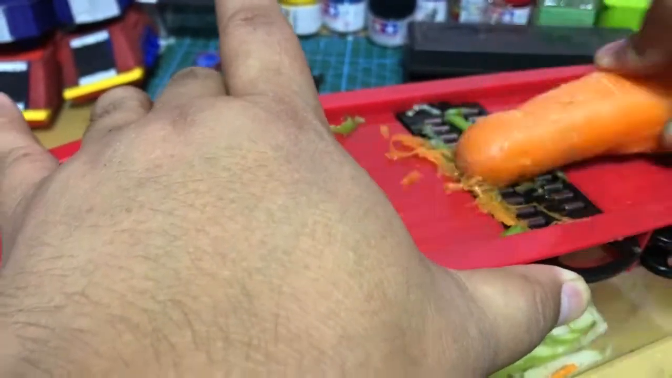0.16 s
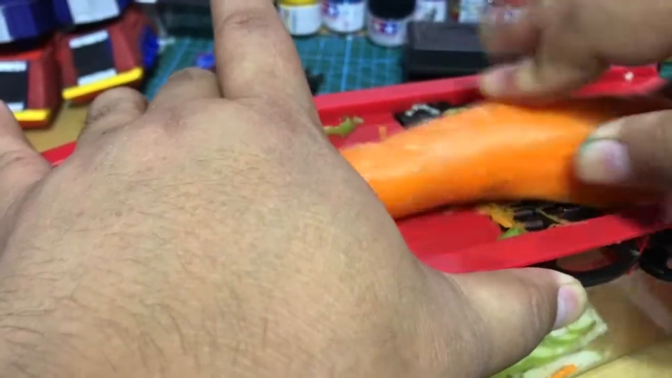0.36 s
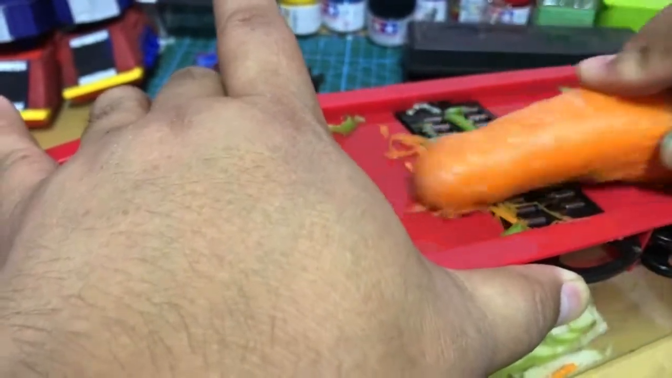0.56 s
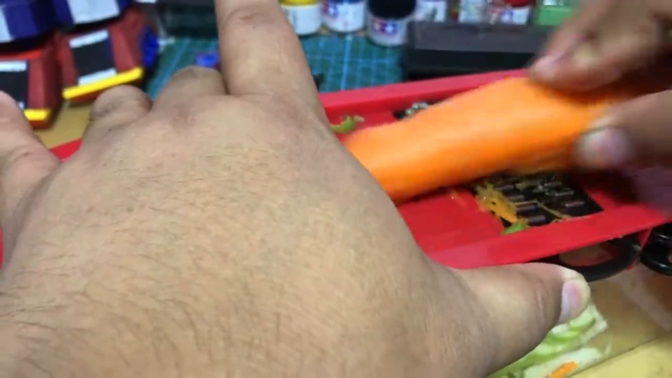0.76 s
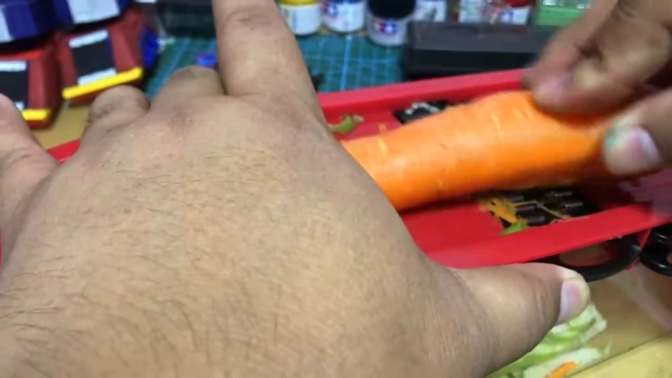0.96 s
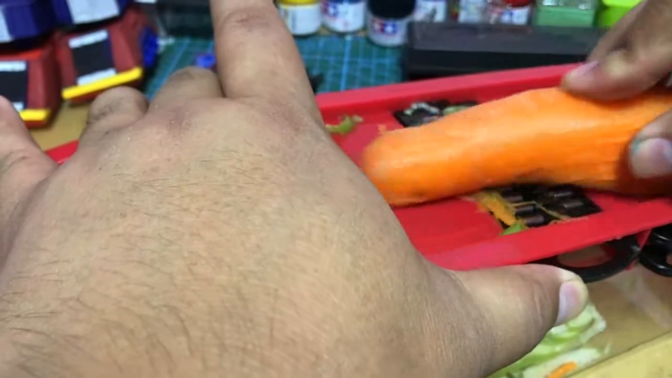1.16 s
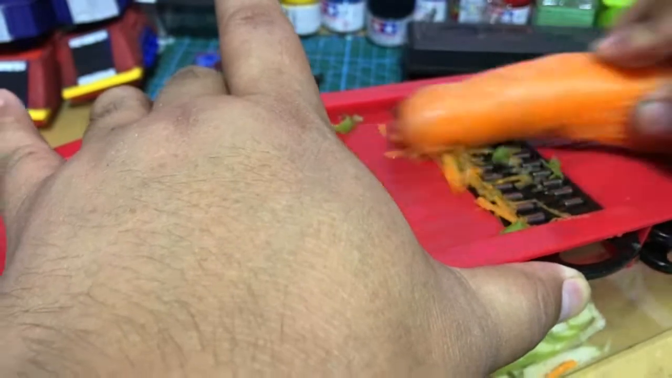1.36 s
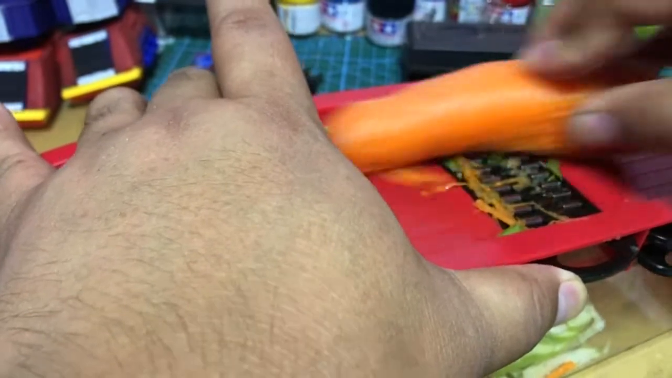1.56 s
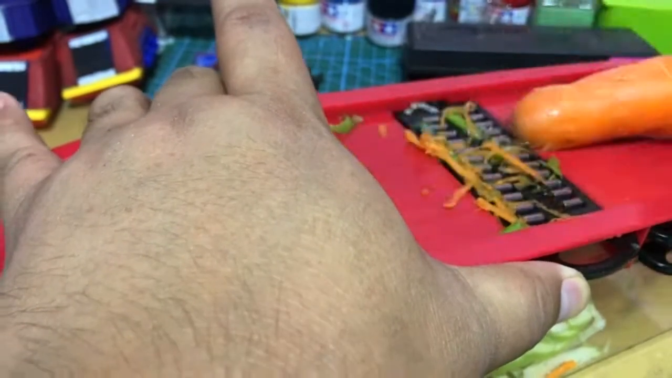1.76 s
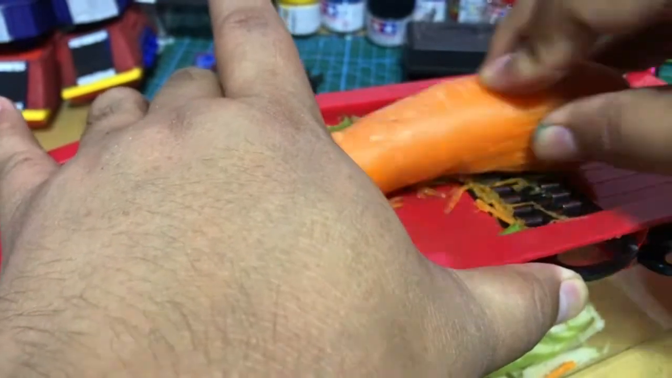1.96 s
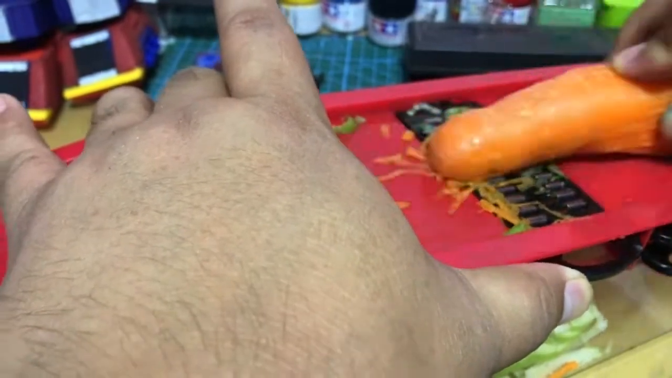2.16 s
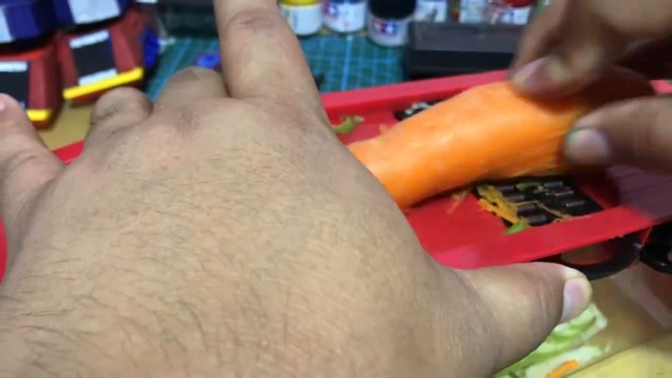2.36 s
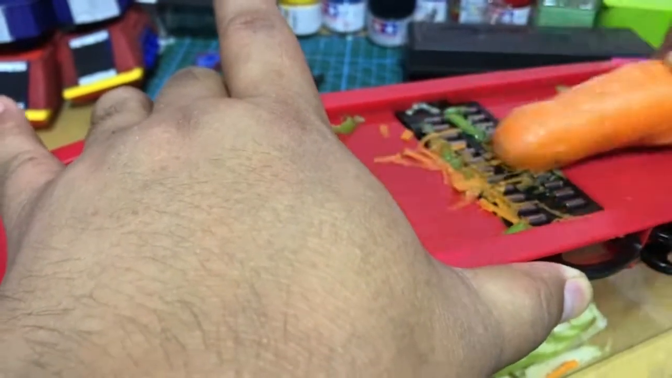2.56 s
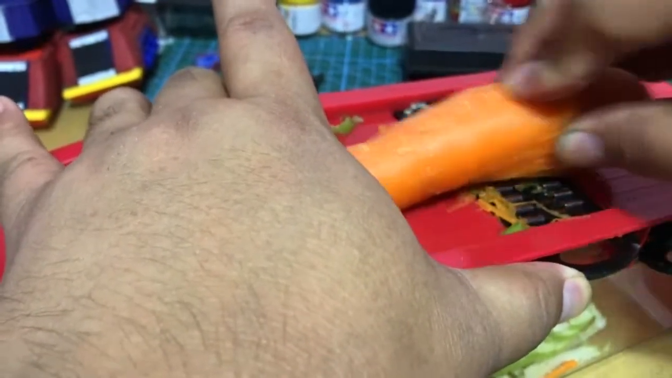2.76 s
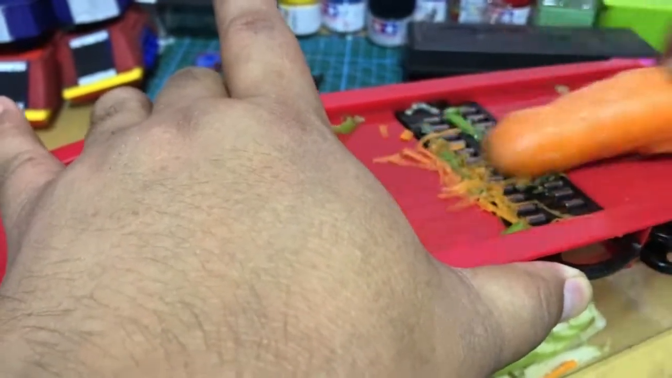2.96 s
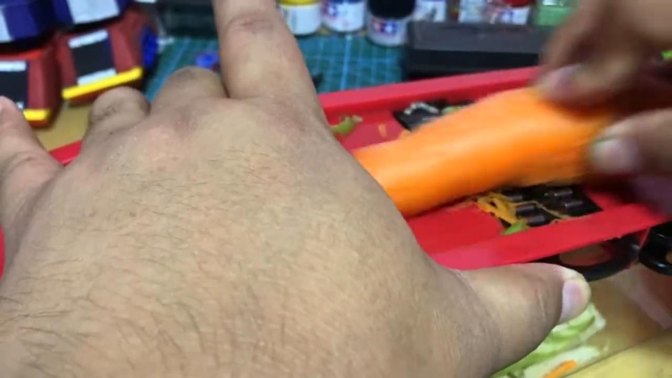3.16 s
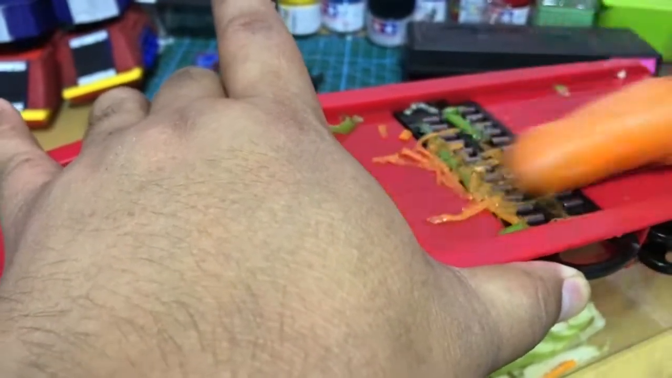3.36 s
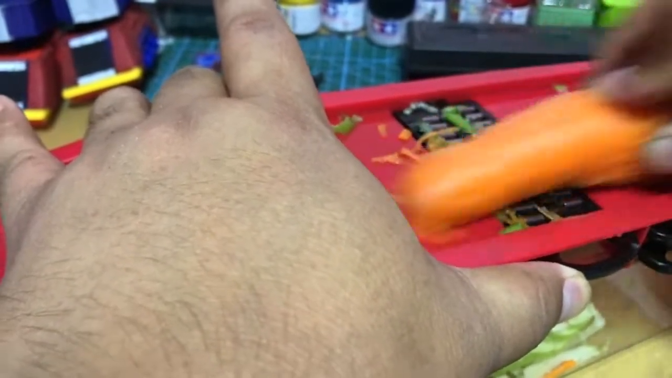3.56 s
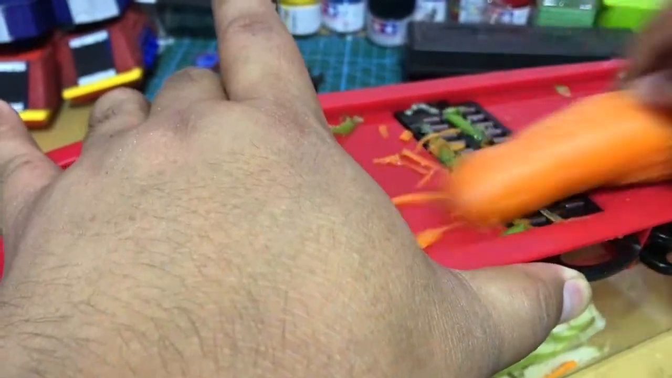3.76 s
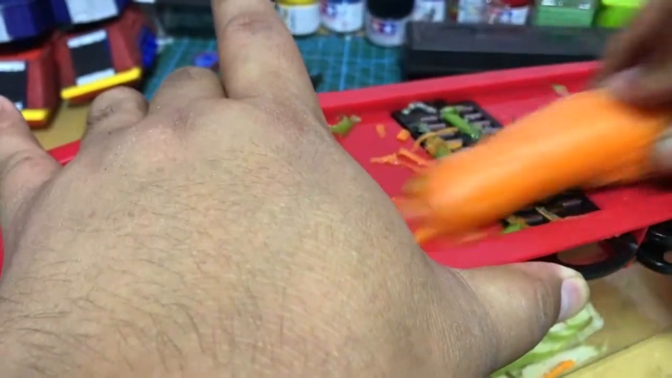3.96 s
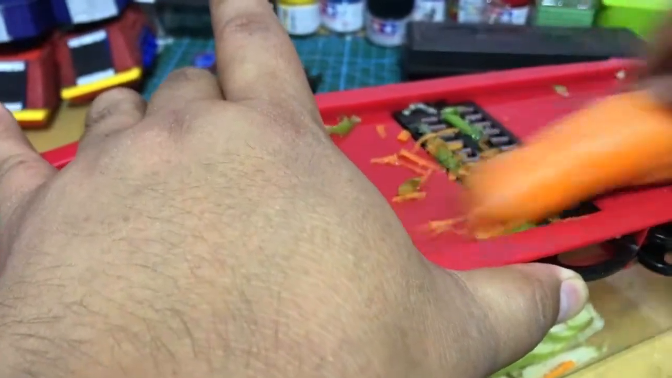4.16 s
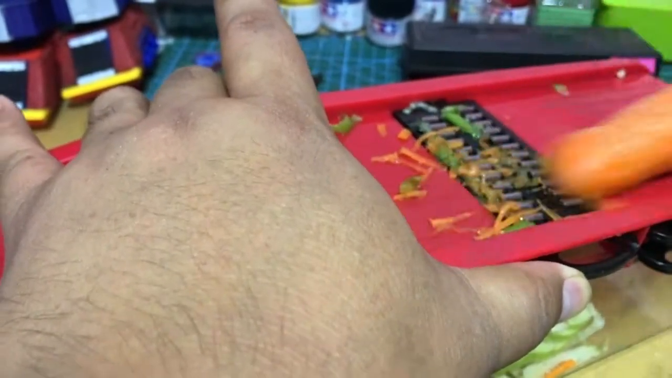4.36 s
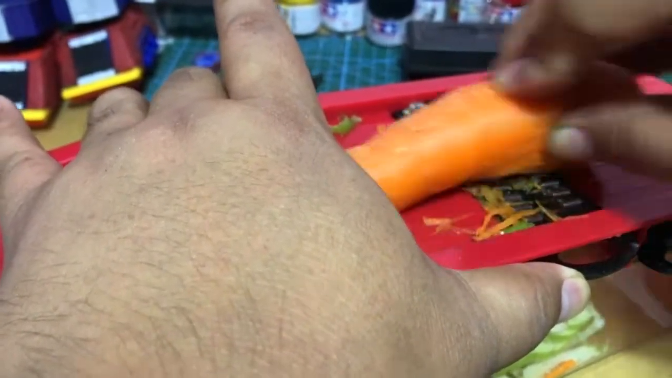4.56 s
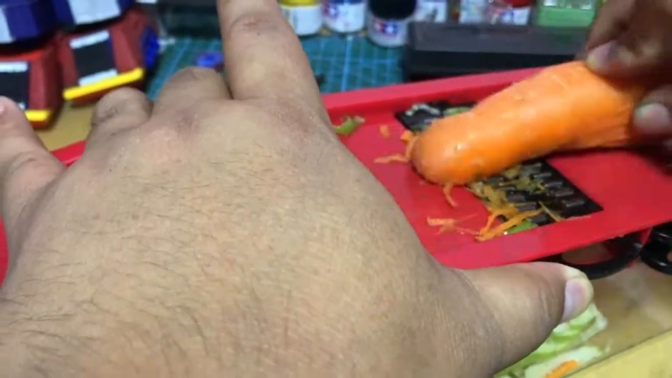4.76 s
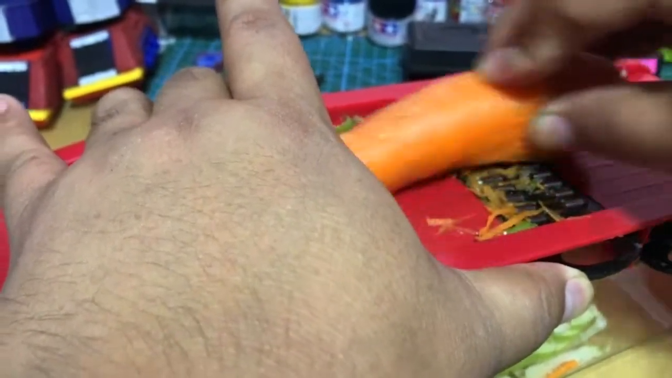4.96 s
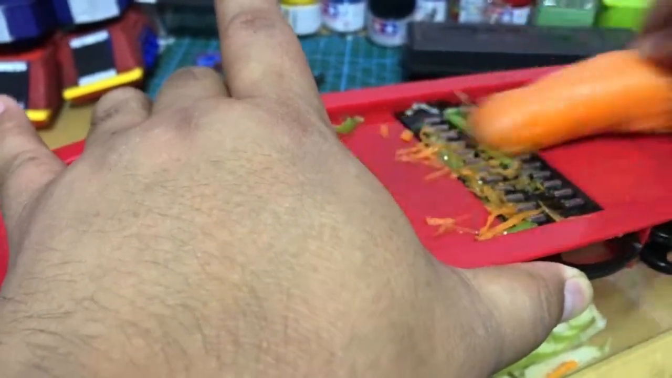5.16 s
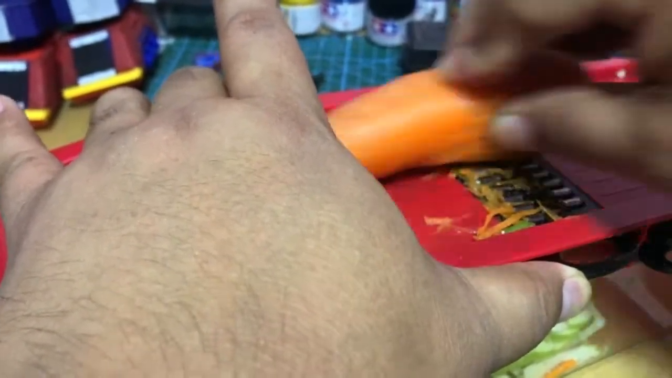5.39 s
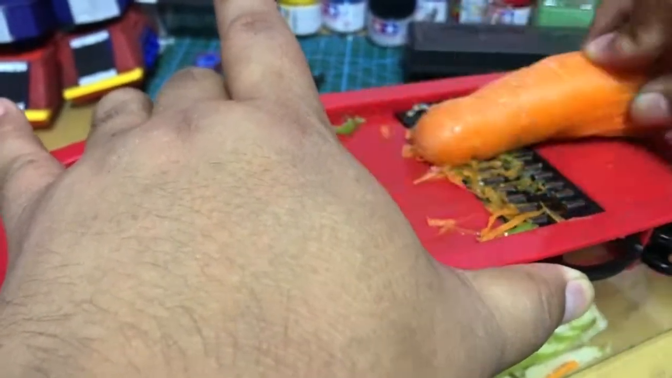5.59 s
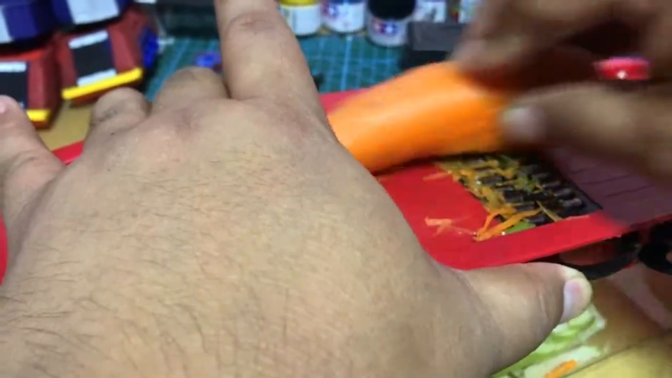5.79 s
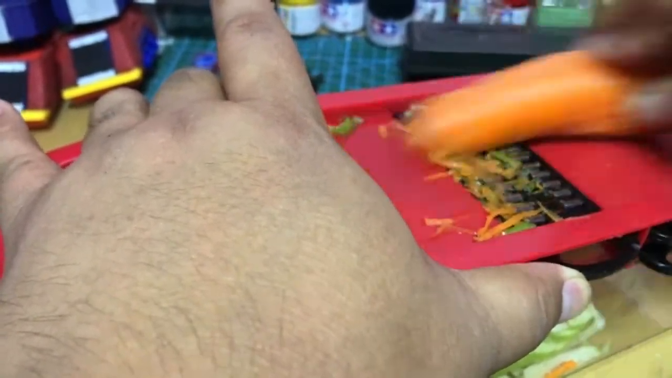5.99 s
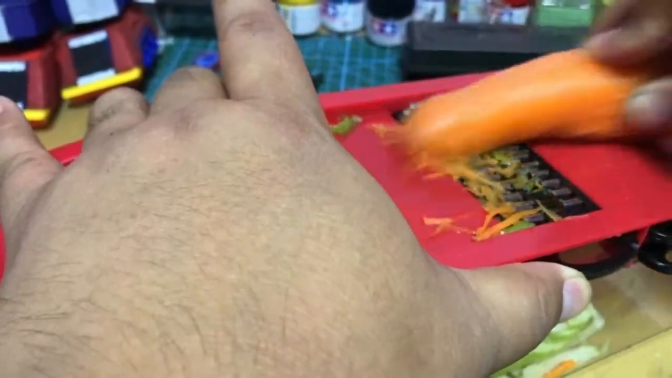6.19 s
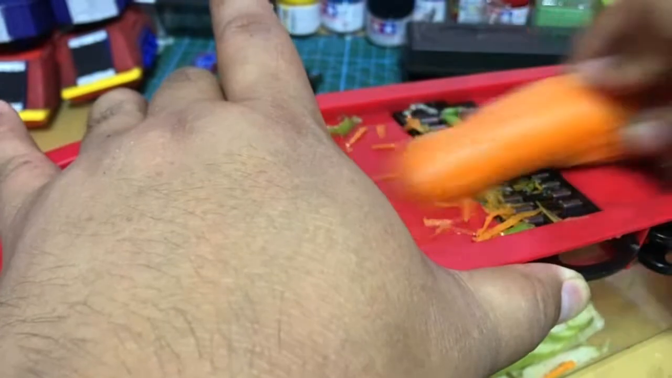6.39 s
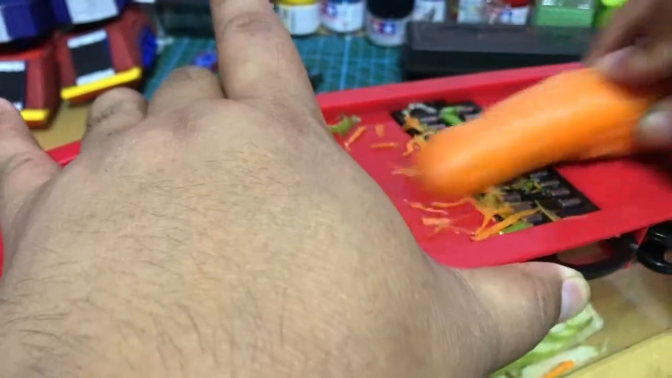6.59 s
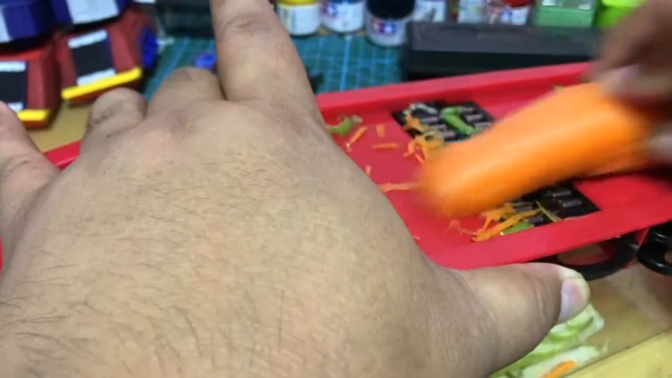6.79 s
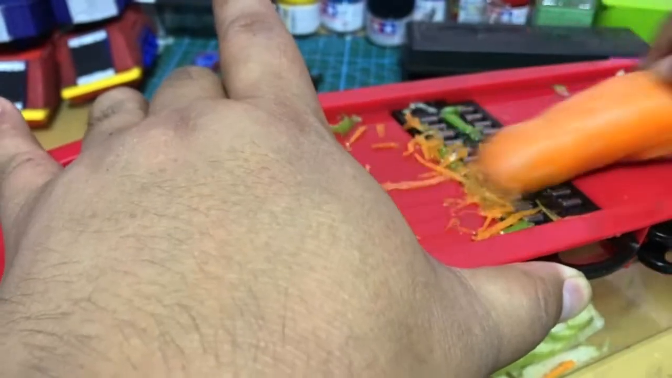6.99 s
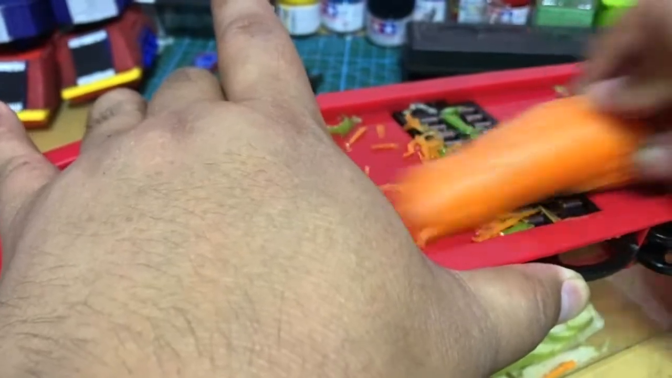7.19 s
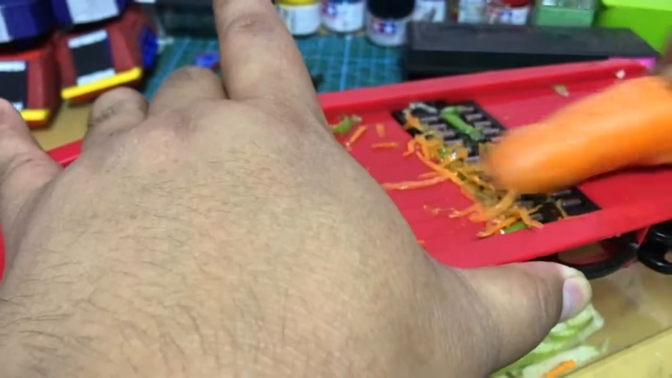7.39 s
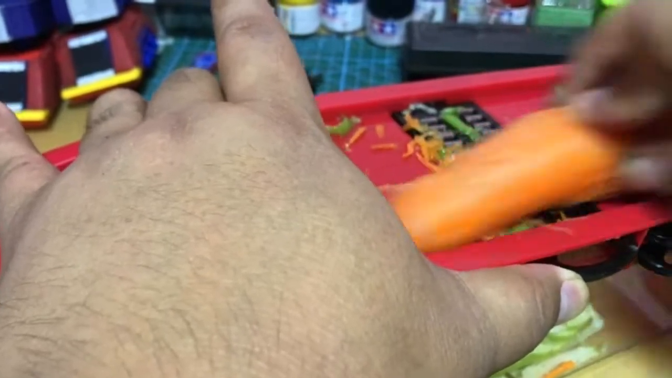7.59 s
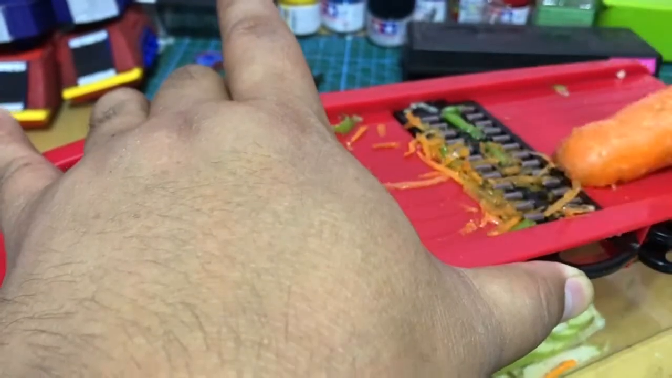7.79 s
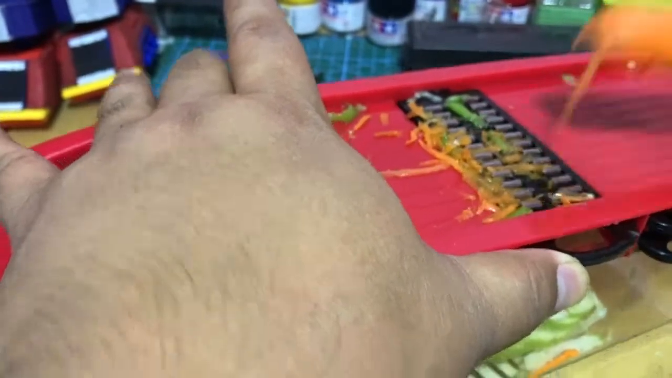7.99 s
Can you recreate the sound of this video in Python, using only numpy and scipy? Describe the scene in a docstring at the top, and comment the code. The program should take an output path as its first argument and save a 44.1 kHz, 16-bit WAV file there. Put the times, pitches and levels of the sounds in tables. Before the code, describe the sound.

A carrot is scraped in quick, steady strokes over a plastic slicer's blades, each cut a crisp grainy rasp with dull thumps and hollow knocks.

```python
"""A carrot is pushed back and forth over the julienne blades of a hand-held plastic slicer in a small room.
It opens with a thump, a knock and a soft slide; then cut follows cut, most with a softer slide between them.
Each cut is a dense crackle of grains with singing blades, and its stick-slip shakes the modes of the frame.
All along, pushes thump the frame, contacts knock it and shreds snap as noise bursts over the blade modes.
A few light taps follow the last stroke; faint filtered room noise lies under everything."""
import sys
import numpy as np
from scipy import signal
from scipy.fft import rfft, irfft, next_fast_len
from scipy.io import wavfile
from scipy.ndimage import uniform_filter1d, map_coordinates

SR = 44100
rng = np.random.default_rng(int(sys.argv[2]) if len(sys.argv) > 2 else 0)


def wav_out(sig):
    """Save sig, one row per channel (or a flat mono array), as 16-bit PCM at SR to the path in sys.argv[1]."""
    wavfile.write(sys.argv[1], SR, np.round(np.clip(np.atleast_2d(sig).T, -1, 1) * 32767).astype(np.int16))


N = 354563
CONTROL_STEP = 32  # samples between control points of a stroke


def undb(db):
    """Decibels to gain."""
    return 10 ** (np.asarray(db) / 20)


def unit(x):
    """Scale to an rms of 1."""
    return x / np.sqrt(np.mean(x ** 2))


def colour(x, points):
    """Filter by a spectrum of (frequency [Hz], level [dB]) points, joined on a log frequency axis."""
    hz, db = np.transpose(points)
    size = next_fast_len(N + 4096)
    f = np.maximum(np.fft.rfftfreq(size, 1 / SR), 1)
    gain = undb(np.interp(np.log(f), np.log(hz), db))
    return irfft(rfft(x, size) * gain, size)[..., :N]


def pass_filter(x, hz, kind, order=2):
    """Low-pass or high-pass."""
    sos = signal.butter(order, min(hz, .45 * SR), kind, fs=SR, output="sos")
    return signal.sosfilt(sos, x + 1e-18)


def band(x, hz, width):
    """One resonance, gain 1 at its centre."""
    hz = min(hz, .45 * SR)
    return signal.lfilter(*signal.iirpeak(hz, hz / min(width, SR / 3), fs=SR), x + 1e-18)


def ring(x, modes):
    """A body that rings with its modes."""
    return sum(undb(db) * band(x, hz, width) for hz, width, db in modes)


def add(track, s, sound, db):
    """Lay a sound into the track at a time; db is the peak of its envelope."""
    start = int(s * SR)
    peak = np.sqrt(2 * uniform_filter1d(sound ** 2, size=200).max())
    part = sound[max(-start, 0):N - start]
    start = max(start, 0)
    track[start:start + len(part)] += undb(db) * part / peak


def flutter(rate, depth_db):
    """A gain that wanders at random, rate times a second."""
    steps = rng.standard_normal(N // 16)
    return undb(depth_db * np.interp(np.arange(N) / SR * rate, np.arange(len(steps)), steps))


def grains(rate, spread_db):
    """Random tiny fractures, rate per second, a few much larger than the rest."""
    hit = rng.random(N) < rate / SR
    size = undb(spread_db * np.minimum(rng.exponential(size=N), 4))
    return unit(hit * size * rng.choice([-1, 1], N))


# colour of the quiet room: (frequency [Hz], level [dB])
AIR_COLOUR = [(25, -16.5), (45, -13.5), (70, 9), (130, -2.5), (300, -3.5), (600, -8), (1200, -26),
              (2000, -36), (8000, -34), (16000, -47.5)]


def air():
    """Faint, diffuse room noise: independent coloured noise in each channel."""
    return undb(-71.5) * unit(colour(rng.standard_normal((2, N)), AIR_COLOUR))


PORT_LAG_MS = 0.289  # direct sound reaches the right port this much later


def room(x, near_db, tail_db, t60, near_s=0.0087):
    """Direct sound reaches the left port first; desk and hands scatter it, then the walls answer."""
    t = np.arange(SR // 2) / SR
    near, tail = rng.standard_normal((2, 2, len(t)))
    near = pass_filter(near * np.exp(-t / near_s) * (t > .001), 550, "high")
    tail = tail * np.exp(-np.log(1000) * t / t60) * (t > .007)
    tail = pass_filter(pass_filter(tail, 200, "high"), 16000, "low", order=1)
    response = (undb(near_db) * unit(near) + undb(tail_db) * unit(tail)) / np.sqrt(len(t))
    late = map_coordinates(x, [np.arange(N) - PORT_LAG_MS * SR / 1000], order=3)
    return np.array([x, late]) + signal.fftconvolve(x[None], response, axes=1)[:, :N]


# modes of the plastic frame: (frequency [Hz], width [Hz], level [dB])
FRAME_MODES = [(83.4, 2.5, 0.5), (108, 18.1, 3.5), (152.8, 38.5, -2), (240.8, 28, -3), (317, 50, -8),
               (381.4, 19, -5), (451.3, 33.4, 3.5), (505.5, 33, 2), (570.3, 18, 3.5), (663.6, 16.2, 2),
               (790, 120, -13.5), (930.4, 59, -4.5), (995, 48, -7), (1091, 60, -10.5), (1276, 110, -15)]


def ring_frame(force):
    """The plastic frame answers a force with all its modes."""
    return ring(force, FRAME_MODES)


def rumble(judder_db, hold_s=0.41):
    """While the hand works, the frame keeps rocking faintly on its support."""
    work = np.sqrt(np.maximum(uniform_filter1d(undb(judder_db) ** 2, int(hold_s * SR) + 1), 0))
    sway = pass_filter(rng.standard_normal(N), 150, "low") * flutter(rate=31, depth_db=7.5)
    return undb(-6) * work * unit(ring_frame(sway) + undb(-11) * sway)


# the frame rocks under the hand:
# (time [s], peak level before the common trim [dB], pitch of the push [Hz])
THUMPS = [(0.027, -29, 94.4), (0.061, -32, 106), (0.396, -28, 113), (0.473, -42, 101), (0.557, -44, 83.4),
          (0.6, -44.5, 96.9), (0.679, -35, 163), (0.702, -38, 86.1), (1.227, -46, 116), (1.388, -26.5, 120),
          (1.469, -30, 108), (1.546, -30.5, 105), (1.59, -30, 119), (2.372, -24, 120), (2.933, -32, 153),
          (3.174, -32.5, 108), (3.7, -40, 87), (3.868, -32, 99.6), (3.921, -26, 124), (4.048, -23.5, 111),
          (4.118, -30.5, 109), (4.172, -29.5, 103), (4.635, -35, 118), (4.732, -33, 136.6),
          (5.013, -29, 112), (5.048, -27, 132), (5.187, -28, 138), (5.468, -28, 116), (5.626, -33.5, 124),
          (5.914, -29, 117), (5.973, -36, 114), (6.026, -35.5, 135), (6.354, -32.5, 99), (6.674, -33, 108),
          (6.745, -30.5, 108), (7.073, -36, 101), (7.117, -26.5, 134), (7.381, -43.5, 137),
          (7.404, -29.5, 140), (7.565, -49.5, 160), (7.719, -39, 215)]


def thumps(push_cycles=0.7, delay_s=0.0077):
    """A soft push and release rocks the low modes of the frame."""
    out, t = np.zeros(N), np.arange(SR // 4) / SR
    for s, db, hz in THUMPS:
        turn = (t - delay_s) * hz  # cycles from the middle of the push
        push = np.sin(2 * np.pi * turn) * np.exp(-(turn / push_cycles) ** 2)
        add(out, s - .003, ring_frame(push), db - 2.5)
    return out


# the carrot bumps the plastic:
# (time [s], peak level before the common trim [dB], share of the upper modes before upper_db [dB])
KNOCKS = [(0.011, -49.5, 4.5), (0.394, -43, -7.5), (0.471, -44, -14), (0.694, -36.5, -2), (1.064, -51, -15),
          (1.21, -45.5, -20), (1.284, -38.5, -12), (1.59, -58, -11), (1.698, -44.5, 2),
          (1.743, -30.5, -16.5), (1.913, -42, -14), (2.137, -33, -9), (2.374, -38, 6), (2.514, -41, -5),
          (2.939, -31.5, -10.5), (3.918, -15.5, -8), (3.945, -35.5, 0.5), (4.044, -37.5, -1),
          (4.121, -35, -13.5), (4.283, -42.5, -8), (4.733, -40.5, -10), (5.48, -40, 13), (5.648, -34, -8.5),
          (5.886, -40, -7), (5.922, -40.5, -7), (6.452, -37.5, -11), (6.671, -45, -3), (7.564, -56, -11),
          (7.661, -56, -29), (7.719, -46, -9), (7.765, -50.5, -18), (7.957, -50.5, -5.5), (7.973, -66, -12)]


def knocks(lead_s=0.0047, chatter_s=0.013, chatter_db=-24, softness=0.79, upper_db=1.5):
    """A contact with a short chatter rings the frame; light touches scuff into it, hard blows land cleanly."""
    out, t = np.zeros(N), (np.arange(SR // 4) - SR // 50) / SR  # contact at t = 0
    scuff = np.exp(-np.abs(t) / np.where(t < 0, lead_s, chatter_s))
    noises = rng.standard_normal((len(KNOCKS), len(t)))
    for (s, db, hard_db), noise in zip(KNOCKS, noises):
        # the weaker the knock, the more chatter beside the click
        force = (t == 0) + undb(chatter_db - softness * (db + 33.5)) * noise * scuff
        force = pass_filter(pass_filter(force, 360, "high"), 1000, "low", order=5)
        sound = ring_frame(force)
        lower = pass_filter(sound, 660, "low", order=3)
        upper = pass_filter(sound, 530, "high", order=3)
        add(out, s + t[0], unit(lower) + undb(hard_db + upper_db) * unit(upper), db - 2)
    return out


def judder(judder_db):
    """The carrot sticks and slips on the plastic; as it travels it drives now one mode, now another."""
    slips = pass_filter(grains(rate=1300, spread_db=4.0) * flutter(rate=97, depth_db=1.5), 88, "high")
    force = slips * undb(judder_db + 2.5)
    modes = np.zeros(N)
    for k, mode in enumerate(FRAME_MODES):
        swing = (-1) ** k  # neighbouring modes swing in opposite directions
        modes += swing * ring(force * flutter(rate=11, depth_db=3.5), [mode])
    return modes / np.std(ring_frame(slips))


# modes of the blade plate: (frequency [Hz], width [Hz], level [dB])
BLADE_MODES = [(2103, 19, -2), (2350, 33, -2), (2946, 140, -2.5), (4350, 70, -12), (5330, 89, -4.5),
               (7650, 64, -6), (10450, 310, -7.5)]


def ring_blades(force):
    """The blade plate answers a force with all its modes."""
    return ring(force, BLADE_MODES)


# shreds snap off on the blades:
# (time [s], peak level before the common trim [dB], centre frequency [Hz])
SNAPS = [(0.01, -41, 2860), (0.114, -41.5, 3950), (0.172, -44, 7000), (0.334, -48.5, 7950),
         (0.541, -45, 6200), (0.609, -44, 9150), (0.698, -43.5, 3060), (1.207, -47.5, 3120),
         (1.282, -40, 4750), (1.309, -36, 6390), (1.430, -44, 9000), (1.558, -33.5, 7840),
         (1.695, -42, 3200), (1.737, -35, 3050), (1.914, -42.5, 2970), (2.022, -46, 10500),
         (2.134, -40, 4500), (2.435, -37, 7190), (2.555, -40, 4100), (2.864, -33.5, 10400),
         (2.936, -41.5, 3500), (3.374, -40, 7840), (3.693, -51, 8000), (3.803, -39.5, 4190),
         (4.039, -44.5, 5000), (4.088, -45, 7000), (4.75, -46, 2790), (5.073, -41, 8030),
         (5.133, -44.5, 4500), (5.477, -37, 2940), (5.569, -42, 4300), (5.886, -46.5, 5400),
         (5.930, -36, 6870), (6.342, -42, 5500), (6.448, -37, 4440), (6.736, -36, 6500), (7.148, -38, 7000),
         (7.290, -41.5, 4470), (7.674, -48.5, 3980), (7.719, -55.5, 3000)]


def snaps(t60=0.038, ragged_db=4.0):
    """A shred stretches, tears free in a short ragged burst and flicks the blade plate."""
    out, t = np.zeros(N), np.arange(SR // 5) / SR - .02
    swell = 1 / (1 + np.exp(-(t - .003) / .0022)) + .06
    shape = swell * np.exp(-np.log(1000) * np.abs(t) / t60)
    draws = rng.standard_normal((len(SNAPS), 2, len(t)))
    for (s, db, hz), (noise, tear) in zip(SNAPS, draws):
        ragged = undb(ragged_db * np.interp((t - t[0]) * 300, np.arange(len(t)), tear))
        burst = band(noise * ragged * shape, hz, 1.16 * hz)
        burst = burst + undb(6.5) * ring_blades(burst)
        burst = pass_filter(pass_filter(burst, 1100, "high"), 11000, "low", order=4)
        add(out, s + t[0], burst, db - 9.0)
    return out


# the strongest resonance of the blades, and the width of each of its two bands in series
SING_HZ, SING_WIDTH_HZ = 4570, 1500
# colour of the bursting cells: (frequency [Hz], level [dB])
CRUNCH_COLOUR = [(300, 2.5), (900, 1.5), (1600, 0.5), (2600, 1.5), (4400, 0), (6200, 0), (8200, -4.5),
                 (10500, -7), (12200, -7), (13500, -11.5), (15800, -16)]


def rasp(rasp_db, fizz_db, sing_db):
    """Cells burst in uneven bunches at one spot of the blades; a firm bite makes them sing, a fast cut fizzes."""
    cells = colour(grains(rate=3000, spread_db=3.0) * flutter(rate=280, depth_db=4.5), CRUNCH_COLOUR)
    fibres = colour(grains(rate=160, spread_db=1.0), CRUNCH_COLOUR)  # tougher fibres tear one by one
    cells = cells + undb(-5.0) * fibres
    cells = cells + undb(-13.0) * flutter(rate=21, depth_db=4.5) * ring_blades(cells)
    coarse = pass_filter(cells, 5650, "low", order=3)
    fine = pass_filter(cells, 7550, "high", order=3)
    fine_share = np.clip(undb(fizz_db) ** 2, 0, .85)
    crackle = np.sqrt(1 - fine_share) * unit(coarse) + np.sqrt(fine_share) * unit(fine)
    sing = grains(rate=2900, spread_db=2.0)
    for _ in range(2):
        sing = band(sing, SING_HZ, SING_WIDTH_HZ)
    # the singing stands out only when the bite lifts it above the crackle
    sing_share = np.maximum(undb(sing_db) ** 2 - undb(-12.5) ** 2, 0)
    return undb(rasp_db - 5.5) * (crackle + undb(-4.0) * np.sqrt(sing_share) * unit(sing))


def stroke(s, length, rise, fall):
    """Progress 0-1 of a stroke, and its envelope in dB: rise, hold, fall (slopes in dB per s)."""
    t = np.arange(0, N, CONTROL_STEP) / SR - s
    edge_db = -rise * np.maximum(-t, 0) - fall * np.maximum(t - length, 0)
    return np.clip(t / length, 0, 1), edge_db


JUDDER_RISE, JUDDER_FALL = 350, 287  # dB per s, for cuts and slides alike
SLIDE_RISE, SLIDE_FALL = 170, 158  # dB per s
SLIDE_FIZZ_DB = -7  # a light slide fizzes a little and does not make the blades sing
# the carrot slides over the plastic without cutting, mostly on its way back; levels before trims:
# (time [s], length [s], rasp level [dB], frame judder level [dB])
SLIDES = [(0.024, 0.036, -55.5, -44), (0.23, 0.04, -61, -55), (0.378, 0.023, -66.5, -60.5),
          (1.075, 0.032, -76.5, -59), (1.251, 0.025, -59.5, -60.5), (1.398, 0.06, -58, -49.5),
          (1.562, 0.04, -52, -41.5), (1.984, 0.051, -59.5, -47), (2.385, 0.035, -52.5, -44.5),
          (2.789, 0.052, -55, -47.5), (3.21, 0.059, -60, -47.5), (3.639, 0.065, -58, -47.5),
          (4.04, 0.18, -58.5, -48.5), (4.617, 0.02, -56.5, -46), (5.006, 0.034, -51.5, -42),
          (5.414, 0.066, -54.5, -45.5), (5.925, 0.014, -51, -41), (6.289, 0.062, -55, -44.5),
          (6.729, 0.031, -55.5, -46), (7.132, 0.035, -56.5, -42.5)]


def slides():
    """Power of rasp, fizz, singing and judder as the carrot rubs over the plastic uncut."""
    power = 0
    for s, length, rasp_db, judder_db in SLIDES:
        db = rasp_db + stroke(s, length, SLIDE_RISE, SLIDE_FALL)[1]
        shake_db = judder_db + stroke(s, length, JUDDER_RISE, JUDDER_FALL)[1]
        silent_db = np.full_like(db, -np.inf)
        power = power + undb([db, db + SLIDE_FIZZ_DB, silent_db, shake_db]) ** 2
    return power


CUT_RISE, CUT_FALL = 426, 240  # dB per s
JUDDER_SWELL = 0.6  # share of the swell of a cut that the frame follows
# the carrot speeds up through a cut: the share of fine fizz grows and the singing of the blades fades
BITE_FIZZ_DB, EXIT_FIZZ_DB, SING_FADE_DB = -6, -4, -5.5
# the carrot is pushed through the blades; levels before trims:
# (time of the bite [s], length [s], rasp level at the exit [dB], swell from bite to exit [dB],
#  frame judder level at the exit [dB], share of the singing blade at the bite [dB])
CUTS = [(0.111, 0.062, -49.5, 8, -51.5, -0.5), (0.892, 0.0039, -55.5, 8.5, -49, 4),
        (1.314, 0.046, -44.5, 1.5, -42.5, -8), (1.751, 0.033, -39, 4.5, -39, -2),
        (2.154, 0.071, -43, 2.5, -40.5, -4), (2.548, 0.086, -41.5, 6, -40, -2),
        (2.946, 0.1, -39.5, 11.5, -38.5, -4), (3.405, 0.065, -39.5, 9, -39.5, 2),
        (3.823, 0.073, -41, 2.5, -40.5, 0), (4.32, 0.054, -39.5, 7, -39, -12),
        (4.77, 0.065, -42.5, -1, -37, -1), (5.146, 0.095, -37, 17, -36, -1.5),
        (5.625, 0.074, -39, 3.5, -36.5, -5.5), (6.069, .062, -40.5, 5.5, -40, -1),
        (6.472, 0.061, -41, 2, -41, 3.5), (6.902, 0.041, -38.5, 4, -36.5, 1.5),
        (7.315, 0.061, -43.5, 4.5, -39, -1.5)]


def cuts():
    """Power of rasp, fizz, singing and judder as the carrot is driven through the blades."""
    power = 0
    for s, length, rasp_db, swell_db, judder_db, sing_db in CUTS:
        progress, edge_db = stroke(s, length, CUT_RISE, CUT_FALL)
        effort_db = swell_db * (progress - 1)
        db = rasp_db + effort_db + edge_db
        fizz_db = BITE_FIZZ_DB + (EXIT_FIZZ_DB - BITE_FIZZ_DB) * progress
        fading_sing_db = sing_db + SING_FADE_DB * progress
        shake_edge_db = stroke(s, length, JUDDER_RISE, JUDDER_FALL)[1]
        shake_db = judder_db + JUDDER_SWELL * effort_db + shake_edge_db
        power = power + undb([db, db + fizz_db, db + fading_sing_db, shake_db]) ** 2
    return power


def hand():
    """Cuts and slides add up to four controls in dB: rasp, its shares of fizz and singing, and frame judder."""
    levels_db = 10 * np.log10(cuts() + slides() + 1e-18)
    n, points = np.arange(N), np.arange(0, N, CONTROL_STEP)
    total, fizz, sing, shake = (np.interp(n, points, db) for db in levels_db)
    return total, fizz - total, sing - total, shake


def scene(blade_spots=4, frame_spots=2):
    """Blades and frame sound together; several spots on each radiate along their own paths through the room."""
    rasp_db, fizz_db, sing_db, judder_db = hand()
    # thumps, knocks and rumble share one path, with strong close reflections and a faint, longer room tail
    blows = thumps() + knocks() + rumble(judder_db)
    blows = room(blows, near_db=3.5, tail_db=-11.5, t60=0.44, near_s=0.0055)
    frame = [judder(judder_db) / np.sqrt(frame_spots) for _ in range(frame_spots)]
    hollow = sum(room(x, near_db=-4, tail_db=-15.5, t60=0.28, near_s=0.0087) for x in frame)
    blades = [rasp(rasp_db, fizz_db, sing_db) / np.sqrt(blade_spots) for _ in range(blade_spots)]
    blades.append(snaps())
    bright = sum(room(x, near_db=4.5, tail_db=0.5, t60=0.26, near_s=0.0053) for x in blades)
    return air() + blows + hollow + bright


TOP_HZ = 15650  # upper edge of the sound
# colour of the two microphone ports: (frequency [Hz], left minus right level [dB])
PORT_COLOUR = [(100, 1), (450, -1), (1000, 1.5), (2500, 2.5), (4700, 5.5), (6300, 1), (8000, -5.5),
               (10000, -12), (15000, -8.5)]


def record(dry):
    """Each port has its own colour; the deepest bass and the top are cut."""
    ports = []
    for x, side in zip(dry, (1, -1)):
        ports.append(colour(x, [(hz, side * db / 2) for hz, db in PORT_COLOUR]))
    lean = pass_filter(np.array(ports), 69, "high")
    return signal.sosfilt(signal.ellip(10, .2, 70, TOP_HZ, fs=SR, output="sos"), lean)


dry = scene()
out = record(dry)
wav_out(out)
```